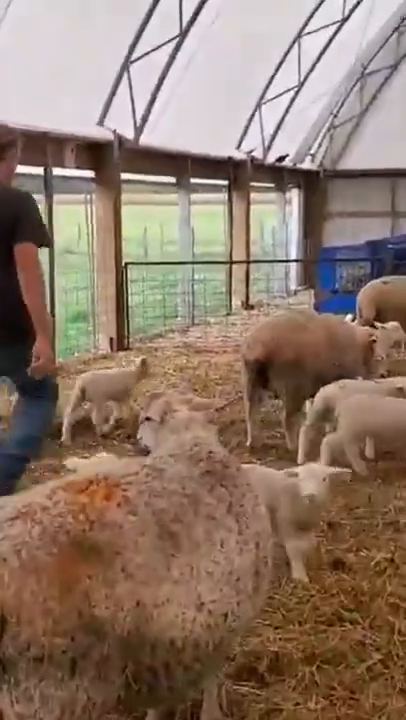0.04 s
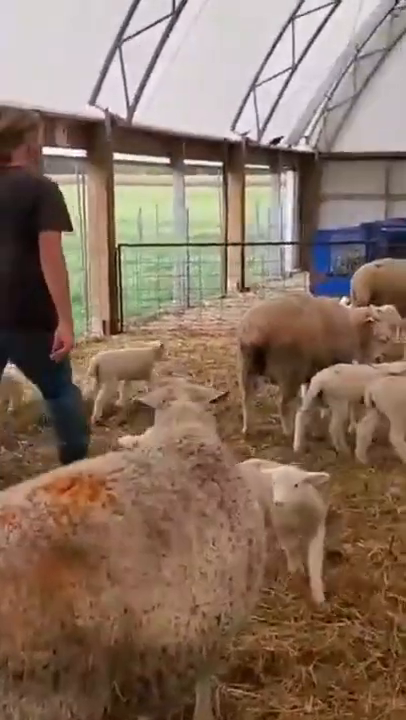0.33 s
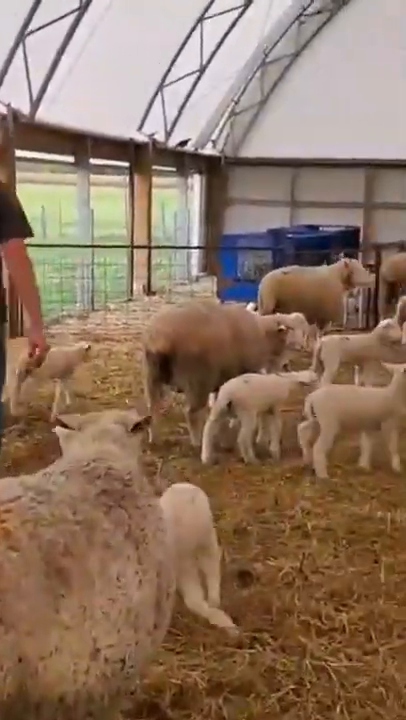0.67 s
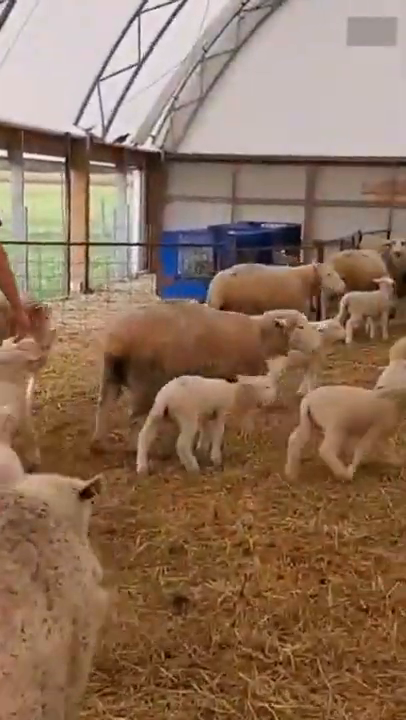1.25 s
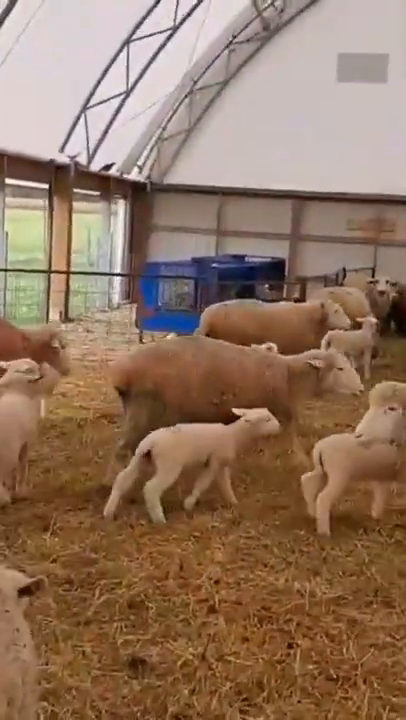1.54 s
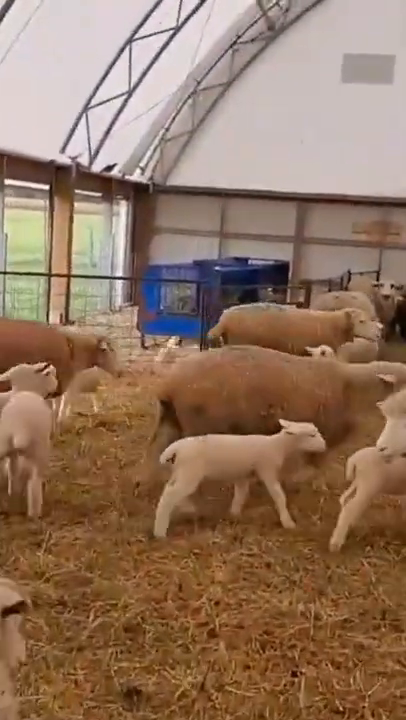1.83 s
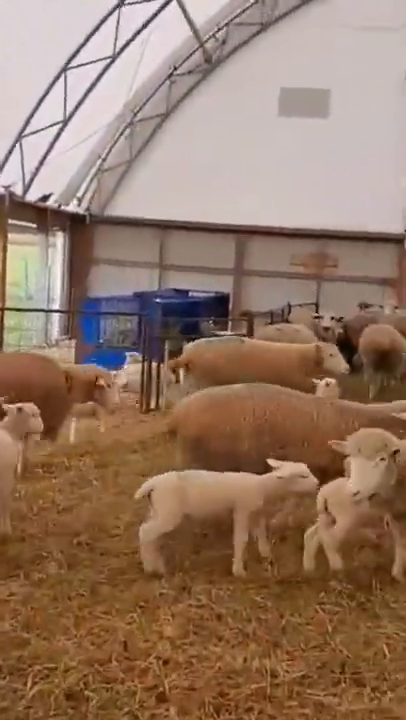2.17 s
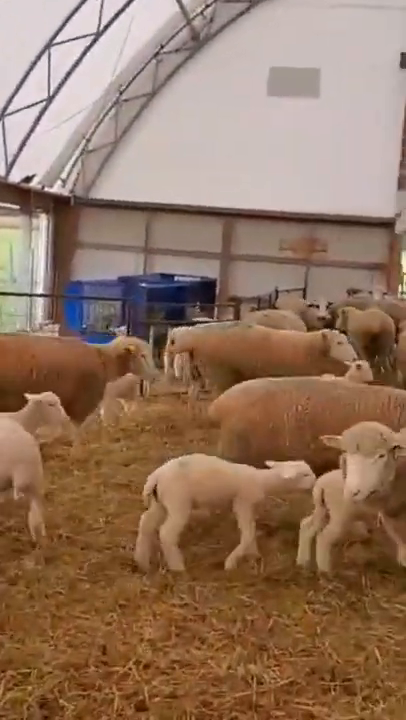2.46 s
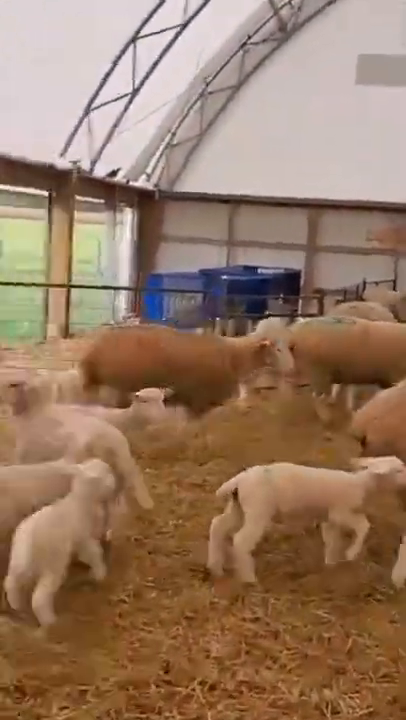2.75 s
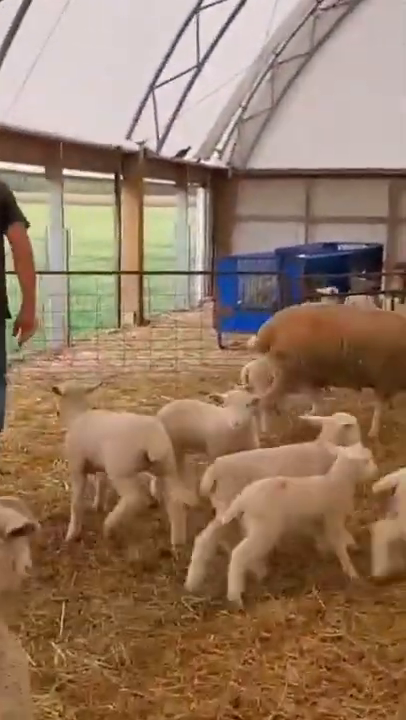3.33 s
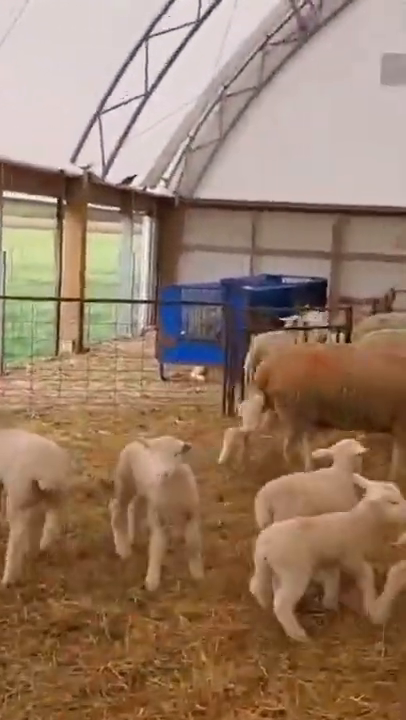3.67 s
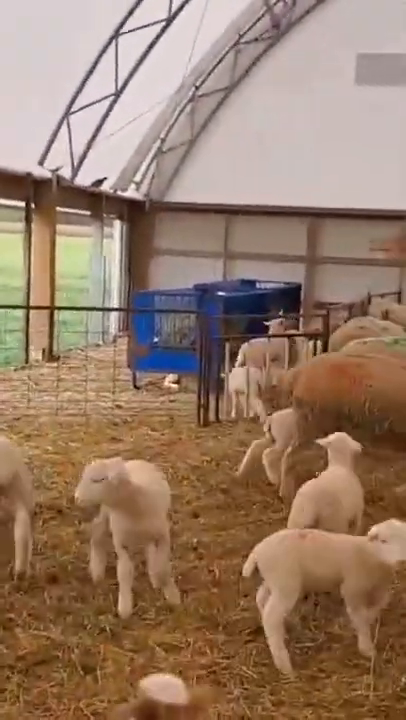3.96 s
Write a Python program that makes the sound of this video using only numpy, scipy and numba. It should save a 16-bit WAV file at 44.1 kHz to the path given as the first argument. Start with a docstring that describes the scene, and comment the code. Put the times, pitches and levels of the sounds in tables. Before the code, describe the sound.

Sheep and lambs bleat over one another in a barn, with soft steps and rustling straw.

```python
"""Ewes and lambs bleat over one another in a fabric-roofed barn, mostly to the left.
Each voice is a train of vocal-fold pulses and breath, shaped by the throat's resonances.
The ewes start hoarse, clear as the pitch arches up and end hoarse; two lamb calls quaver.
Underneath are one short grunt, soft thudding steps, rustling straw and a low rumble."""
import sys
import numpy as np
from scipy import signal
from scipy.fft import rfft, irfft, next_fast_len
from scipy.io import wavfile
from scipy.ndimage import uniform_filter1d
from numba import njit

SR = 44100
rng = np.random.default_rng(int(sys.argv[2]) if len(sys.argv) > 2 else 0)


def persist_wave(psi):
    """Save psi, clipped to +-1, as 16-bit WAV."""
    counts = np.round(np.clip(psi, -1, 1) * 32767).astype(np.int16)
    wavfile.write(sys.argv[1], SR, np.atleast_2d(counts).T)


N = 176400
T = np.arange(N) / SR


def ewes():
    """Six calls drawing on four throat tones, each with its own pitch arch and hoarseness."""
    # calls: (time [s], low band level [dB], high band level [dB], jaw resonance [Hz])
    fading = [(.08, -40.5, -33.5, 600), (.2, -54, -58, 590)]
    loud = [(.56, -41.5, -30, 570), (.594, -36, -24, 586), (.598, -32.5, -25, 636), (.77, -27, -23, 640),
            (.87, -31, -23, 740), (1.0, -30.5, -23.5, 693), (1.11, -30.5, -33.5, 650)]
    hoarse = [(1.1, -33, -33.5, 595), (1.38, -38.5, -34, 550), (1.56, -35.5, -36, 580),
              (1.66, -44, -43.5, 544)]
    long_call = [(1.97, -37, -32, 540), (2.03, -32.5, -26.5, 518), (2.24, -25, -26.5, 560),
                 (2.36, -29, -30, 520), (2.46, -29.5, -26.5, 530), (2.56, -23, -26.5, 605),
                 (2.77, -29.5, -27.5, 628), (2.88, -34.5, -33.5, 592), (3.12, -35.5, -30, 556)]
    answer = [(3.1, -38.5, -34, 575), (3.35, -32.5, -30.5, 605), (3.6, -34.5, -25, 620),
              (3.84, -38.5, -30, 610)]
    last = [(3.76, -42, -32, 626), (3.89, -37.5, -26, 665), (4.02, -31, -30, 650)]
    # upper throat resonances: (frequency [Hz], gain [dB])
    open_throat = [(1300, -10), (1550, 2.5), (1750, -3), (2170, 7.5), (2480, -2.5), (2900, -17.5),
                   (8000, -34.5)]
    hoarse_throat = [(1000, -16), (1450, 0), (1750, -2.5), (2100, 4.5), (2620, -2.5), (2950, -14),
                     (4200, -17.5), (8000, -44)]
    round_throat = [(1230, -13.5), (1390, -2), (1560, -14), (1720, -10.5), (2005, 2), (2170, -9),
                    (2450, -16), (3100, -30.5), (8000, -46)]
    answer_throat = [(950, -21.5), (1250, -4), (1500, 7.5), (1700, -2), (1980, 9), (2400, -0.5),
                     (2900, -10), (3800, -20.5), (8000, -36)]
    # pitch arch per call: (top pitch [Hz], rise [share], sag start [s], sag [share])
    arches = [(161.3, 0.0199, 0.085, 0.055), (157, .2, .8, .1), (181.6, .03, 1.2, 0.2),
              (155.25, 0.11, 2.45, .115), (151.35, .14, 3.52, .09), (153.3, .02, 3.78, 0.12)]
    # voice per call: (roughness at top pitch [0-1], strong-weak pulsing [share], throat shift [share])
    voices = [(.5, 0, 0), (.22, .2, .06), (.8, .1, 0), (.08, .04, 0), (.4, 0, .02), (.7, .1, .03)]
    # body per call: (jaw resonance width [Hz], chest hum [dB])
    bodies = [(120, -45), (127, -32), (176, -39), (70, -38.5), (104, -31.5), (151, -44)]
    calls = [(fading, answer_throat), (loud, open_throat), (hoarse, hoarse_throat),
             (long_call, round_throat), (answer, answer_throat), (last, open_throat)]
    return sum(ewe(*call, *traits) for call, *traits in zip(calls, arches, voices, bodies))


def ewe(call, throat, arch, voice, body):
    """The pitch rises, holds and sags; the further below its top, the hoarser the voice."""
    low_db, high_db, jaw_hz = in_time(call)
    top_hz, rise, sag_s, sag = arch
    top_rough, doubling, shift = voice
    width_hz, chest_db = body
    start, end = call[0][0], call[-1][0]
    rise_s, split_hz, flutter_per_s = .095, 1135, 45
    drop = rise * np.exp(-np.maximum(T - start, 0) / rise_s)
    drop += sag * np.clip((T - sag_s) / (end - sag_s), 0, 1) ** 2
    hz = top_hz * (1 - drop)
    rough = np.minimum(top_rough + 3 * drop, .9)
    buzz = vocal_folds(hz, rough, doubling)
    # the jaw moves the lowest resonance; the upper ones rise as the mouth opens
    jaw = resonance(buzz, jaw_hz, float(width_hz), SR)
    narrow = colour(buzz, [(f * (1 - shift), db) for f, db in throat])
    wide = colour(buzz, [(f * (1 + shift), db) for f, db in throat])
    opening = np.clip((T - start) / (end - start), 0, 1)
    mouth = narrow * (1 - opening) + wide * opening
    low = evened(pass_filter(jaw, "low", split_hz, order=5)) * from_db(low_db + 2.5)
    high = evened(pass_filter(mouth, "high", split_hz, order=5)) * from_db(high_db + 3)
    # the chest hums the fundamental
    chest = np.sqrt(2) * np.cos(2 * np.pi * np.cumsum(hz) / SR)
    chest *= (1 - rough / 2) * from_db(chest_db + (high_db - high_db.max()) / 2)
    flutter_db = 1.75 * np.sqrt(rough) * (drift(flutter_per_s) - rough / 2)  # a hoarse voice shakes
    return gate(call) * from_db(flutter_db) * (low + high + chest)


def vocal_folds(hz, rough, doubling=0):
    """One pulse a cycle; roughness unsettles timing and strength and adds a puff of breath to each."""
    jitter_s, shimmer_db = .00012, 2.5  # at full roughness
    phase = np.cumsum(hz * (1 + .045 * rough * drift(120) + .002 * drift(25))) / SR
    at = np.flatnonzero(np.diff(np.floor(phase)))
    jitter, shimmer = rough[at] * rng.standard_normal((3000, 2))[:len(at)].T
    when = at + (np.ceil(phase[at]) - phase[at]) / (phase[at + 1] - phase[at])
    when = np.clip(when + jitter_s * SR * jitter, 0, N - 2)
    strong_weak = 1 + doubling * (-1) ** np.arange(len(at))
    strength = from_db(shimmer_db * shimmer) * strong_weak
    pulses, whole = np.zeros(N), when.astype(int)
    pulses[whole] = strength * (1 - when % 1)
    pulses[whole + 1] = strength * (when % 1)
    breath = rms_one(rng.standard_normal(N) * np.exp(-5 * (phase % 1)))
    return pass_filter(evened(pulses) + .7 * rough * breath, "high", hz=90, order=2)


@njit
def resonance(x, hz, width_hz, sr):
    """A resonance whose centre moves."""
    y = np.zeros(len(x))
    r = np.exp(-np.pi * width_hz / sr)
    for i in range(2, len(x)):
        y[i] = (1 - r) * x[i] + 2 * r * np.cos(2 * np.pi * hz[i] / sr) * y[i - 1] - r * r * y[i - 2]
    return y


def lambs():
    """Two quavering calls and a clear one between them."""
    # calls: (time [s], pitch [Hz], level [dB])
    first_call = [(.15, 300, -36), (.21, 308.8, -42), (.29, 278.8, -38), (.37, 286, -37.5),
                  (.52, 292.2, -36), (.7, 283.2, -39.5), (.84, 286.6, -50)]
    clear_call = [(1.5, 284.5, -50), (1.63, 303.7, -38.5), (1.72, 318.4, -37.5), (1.83, 316.5, -39),
                  (1.88, 312, -53)]
    late_call = [(2.22, 272.7, -44.5), (2.36, 294.7, -37.5), (2.45, 290.7, -32), (2.53, 287.2, -36),
                 (2.62, 287.8, -37.5), (2.85, 270, -46.5)]
    # throat resonances: (frequency [Hz], gain [dB])
    quaver_throat = [(290, -19.5), (860, -20.5), (1150, -16), (1500, -31), (2150, -22.5), (2600, -5),
                     (2880, -6), (3250, -17), (3750, -3.5), (4100, -2), (4700, -11.5), (5500, -22),
                     (9000, -26.5)]
    clear_throat = [(630, -8.5), (950, -12.5), (1270, 3.5), (1600, -7), (2220, -1), (2550, -11),
                    (2860, 8.5), (3200, -20), (3800, -6.5), (4450, -0.5), (4800, -10), (9000, -18)]
    first = bleat(first_call, quaver_throat, rough=.08, quaver_db=8.5, crest_s=.368)
    late = bleat(late_call, quaver_throat, rough=.117, quaver_db=6, crest_s=2.45)
    clear = bleat(clear_call, clear_throat, rough=.06)
    return from_db(4.5) * (first + late) + from_db(4) * clear


def bleat(call, throat, rough, quaver_db=0, crest_s=0):
    """Vocal folds through a still throat; any quaver shakes level and pitch together."""
    hz, db = in_time(call)
    quaver_hz = 12.8
    shake_db = quaver_db * np.cos(2 * np.pi * quaver_hz * (T - crest_s))
    vibrato = 1 + .026 * shake_db / (quaver_db + 3.5)
    voice = colour(vocal_folds(hz * vibrato, np.full(N, rough)), throat)
    return gate(call) * evened(voice) * from_db(db + shake_db - quaver_db / 2)


def grunt():
    """A short, rough grunt, muffled by a closed mouth."""
    # call: (time [s], pitch [Hz], level [dB])
    call = [(1.782, 214.7, -33.5), (1.831, 198.3, -36), (1.88, 202, -44), (1.95, 238, -33.5)]
    # closed-mouth tone: (frequency [Hz], gain [dB])
    throat = [(200, 2), (420, -28), (3000, -23)]
    return bleat(call, throat, rough=.81)


def steps():
    """Soft footfalls: dull thuds that swell and die over an uneven rumble of the same tone."""
    # footfalls: (time [s], level [dB], left over right [dB])
    footfalls = [(0.625, -25.5, -28), (1.473, -25.5, -3), (1.614, -20, -27), (2.294, -26, 2),
                 (2.566, -24, -3), (2.651, -17.5, 0), (2.88, -19.5, -12), (3.343, -20.5, 0),
                 (3.6, -21.5, -16), (3.755, -25.5, -13), (3.94, -18, 0)]
    # thud spectrum: (frequency [Hz], gain [dB])
    thud_tone = [(25, -31.5), (50, -1.5), (80, 2), (120, -9), (200, -18), (400, -49.5), (1500, -49.5)]
    # rumble envelope: (time [s], level [dB])
    rumble = [(.1, -47.5), (.24, -39.5), (.3, -28), (.46, -25.5), (.5, -37), (1.55, -37.5), (1.8, -42.5),
              (2.2, -42), (2.45, -31.5), (3.2, -40), (3.45, -32.5), (4, -31)]
    rise_s = .01
    power = (from_db(in_time(rumble)[0]) * panned(-7)) ** 2
    for start, db, pan_db in footfalls:
        age = np.maximum(T - start, 0) / rise_s
        power += (from_db(db - 2) * panned(pan_db) * age * np.exp(1 - age)) ** 2
    return np.array([evened(side) for side in noise(thud_tone)]) * np.sqrt(power)


def straw():
    """Countless stalks snap and slide under the feet."""
    # rustle envelope: (time [s], level [dB])
    envelope = [(.1, -47), (1.2, -41.5), (1.4, -44), (2.1, -45.5), (2.42, -40), (2.55, -33), (2.64, -39.5),
                (2.9, -43), (3.05, -35.5), (3.35, -40.5), (3.68, -33), (3.82, -39.5), (4, -40)]
    # rustle spectrum: (frequency [Hz], gain [dB])
    tone = [(300, -3), (1000, -8), (3000, 0.5), (5000, -2.5), (8000, -6), (10000, -4), (12500, 2),
            (15500, 1.5)]
    snaps_per_s, spread_db, flicker_db = 2500, 3, 1.7
    sizes = from_db(spread_db * np.minimum(rng.exponential(1, N), 5))
    snapping = rng.random(N) < snaps_per_s / SR
    snaps = rms_one(sizes * snapping * rng.standard_normal((2, N)))
    slide = 1.7 * rng.standard_normal((2, N))
    rustle = rms_one(np.array([colour(side, tone) for side in snaps + slide]))
    level_db = in_time(envelope)[0] + 6.5 + flicker_db * drift(29.94)
    return rustle * from_db(level_db) * panned(2.5)


def scattered(x, delays_s=(.0007, .0013, .0029), share=.5):
    """Nearby bodies and the floor spread each pulse over a few milliseconds."""
    for delay_s in delays_s:
        taps = np.r_[share, np.zeros(int(delay_s * SR)), 1]
        x = signal.lfilter(taps, taps[::-1], x + 1e-18)
    return x


def barn(x, wet_db):
    """Direct sound, a little earlier on the left, plus a diffuse tail that dies band by band."""
    # the flock's place: (frequency [Hz], left over right [dB])
    flock_pan = [(150, 1.5), (600, 1.5), (900, 7.5), (1400, 6.5), (2100, 12), (3000, 10.5), (4200, 7.5),
                 (8000, 1)]
    # reverb decay: (band [Hz], time to fall 60 dB [s])
    decays = [(150, 0.25), (600, 0.99), (2000, 0.48), (5000, 0.38), (12000, 0.5)]
    # reverb width: (frequency [Hz], left-right likeness [0-1])
    likeness = [(150, 1), (500, 0.43), (1000, 0.074), (2000, 0.06)]
    lead_s, predelay_s = .00016, .006
    thin_tail_below_hz = 894  # the reverb is weaker below this, so low notes sound drier
    size = next_fast_len(N + SR)
    hz = np.arange(size // 2 + 1) * SR / size
    t, tail_hz = T[:SR], np.arange(SR // 2 + 1)
    mid, side = rfft(rng.standard_normal((2, SR)))
    alike = np.clip(at_hz(likeness, tail_hz), 0, 1)
    diffuse = np.sqrt(1 + alike) * mid + np.sqrt(1 - alike) * side * [[1], [-1]]
    tail = 0
    for band, t60 in decays:
        share = at_hz([(f, f == band) for f, _ in decays], tail_hz)
        fall = from_db(-60 * t / t60) * (t > predelay_s)
        fall /= np.sqrt(2 * np.sum(fall ** 2))
        tail = tail + irfft(diffuse * share) * fall * min(band / thin_tail_below_hz, 1)
    direct = np.exp(-2j * np.pi * hz * lead_s * np.array([[0], [1]]))
    wet = from_db(wet_db)
    path = (direct + wet * rfft(tail, size)) / np.sqrt(1 + wet ** 2)
    return irfft(rfft(x, size) * path * panned(at_hz(flock_pan, hz)), size)[:, :N]


def room_tone():
    """A faint, steady bed of dark noise."""
    # bed spectrum: (frequency [Hz], gain [dB])
    tone = [(30, 7), (70, 8), (600, -6), (1000, -0.5), (2000, -10), (6000, -18), (15000, -46)]
    return from_db(-45) * noise(tone)


def from_db(db):
    """Decibels to gain."""
    return 10 ** (np.asarray(db) / 20)


def rms_one(x):
    """Scale to rms 1."""
    return x / np.sqrt(np.mean(x ** 2) + 1e-20)


def evened(x):
    """Hold the short-term level at 1."""
    return x / np.sqrt(np.abs(uniform_filter1d(x * x, size=1800)) + 1e-12)


def gate(call, fade_s=.036):
    """Open while a call lasts, with soft edges."""
    return np.clip(np.minimum(T - call[0][0], call[-1][0] - T) / fade_s + .5, 0, 1)


def in_time(rows):
    """Each column of an envelope at every sample."""
    times, *columns = np.transpose(rows)
    return [np.interp(T, times, column) for column in columns]


def at_hz(points, hz):
    """Read a table on a log-frequency axis."""
    freqs, values = np.transpose(points)
    return np.interp(np.log(hz + 1e-3), np.log(freqs), values)


def panned(db):
    """Left and right gains with mean 1; positive dB leans left."""
    gains = from_db(np.array([np.atleast_1d(db), -np.atleast_1d(db)]) / 2)
    return gains / gains.mean(0)


def pass_filter(x, kind, hz, order):
    """Low-pass or high-pass with a flat passband."""
    return signal.sosfilt(signal.butter(order, hz, kind, fs=SR, output="sos"), x)


def colour(x, points, size=8192):
    """Minimum-phase EQ with the given curve."""
    gain = from_db(at_hz(points, np.arange(size // 2 + 1) * SR / size))
    cepstrum = irfft(np.log(gain))
    cepstrum[1:size // 2] *= 2
    cepstrum[size // 2 + 1:] = 0
    impulse = irfft(np.exp(rfft(cepstrum)))[:size // 2]
    return signal.fftconvolve(x, impulse)[:N]


def noise(points):
    """Unrelated coloured noise for each ear, rms 1."""
    return rms_one(np.array([colour(white, points) for white in rng.standard_normal((2, N))]))


def drift(per_s):
    """Smooth random wander, rms 1."""
    knots = rng.standard_normal(4000)
    return rms_one(np.interp(T * per_s, np.arange(len(knots)), knots))


def scene():
    """The flock in the barn's reverb, over dry steps, straw and room tone."""
    ewe_bus = barn(scattered(ewes() + grunt()), wet_db=2)
    lamb_bus = barn(scattered(lambs()), wet_db=-1)
    return ewe_bus + lamb_bus + steps() + straw() + room_tone()


def record(dry):
    """The sound opens after a moment of near silence; the highest treble is cut."""
    start_s, fade_s, cutoff_hz = .086, .008, 15800
    opened = np.clip((T - start_s) / fade_s, .002, 1) * dry
    return signal.sosfilt(signal.ellip(12, .1, 80, cutoff_hz, fs=SR, output="sos"), opened)


dry = scene()
out = record(dry)
persist_wave(out)
```